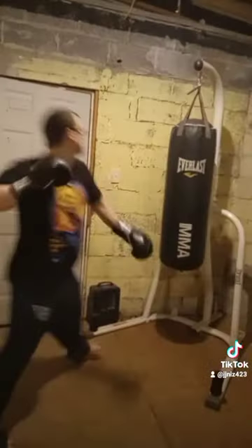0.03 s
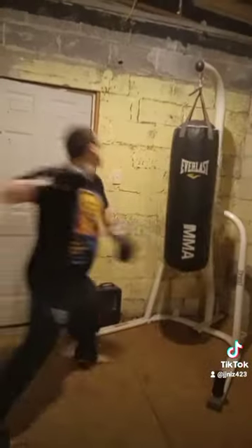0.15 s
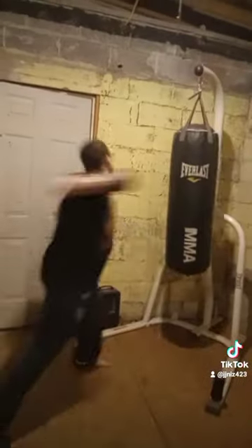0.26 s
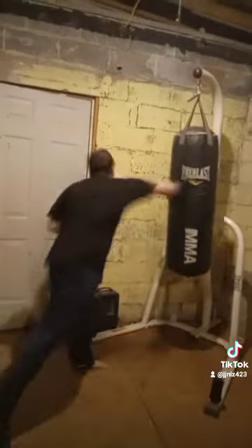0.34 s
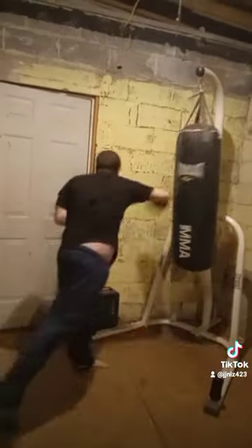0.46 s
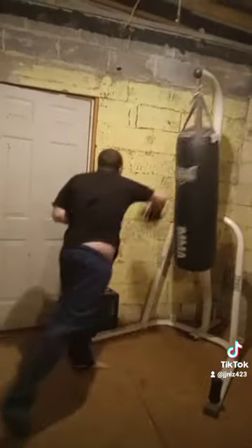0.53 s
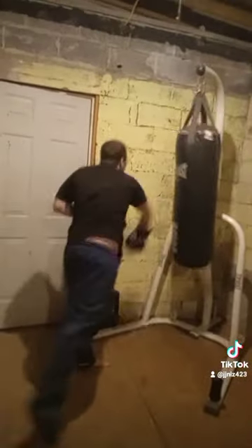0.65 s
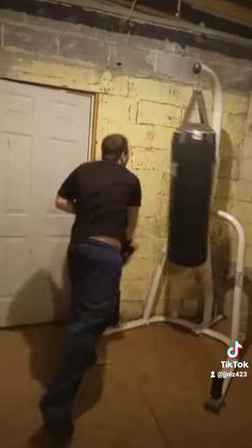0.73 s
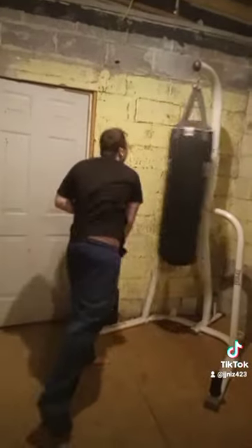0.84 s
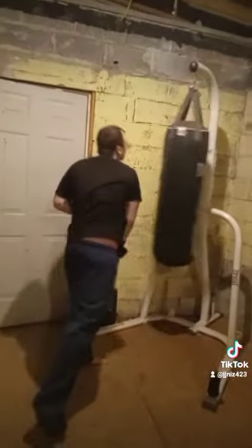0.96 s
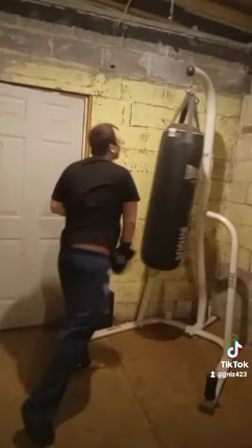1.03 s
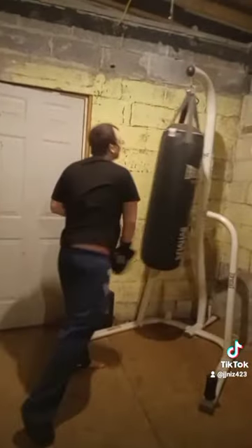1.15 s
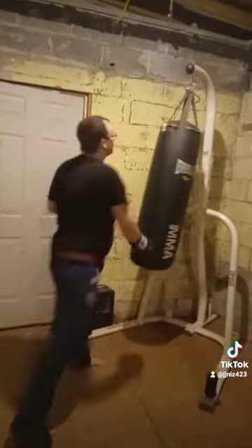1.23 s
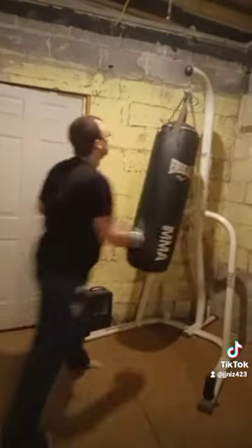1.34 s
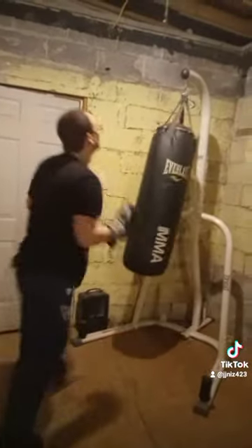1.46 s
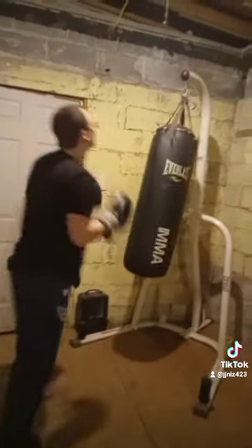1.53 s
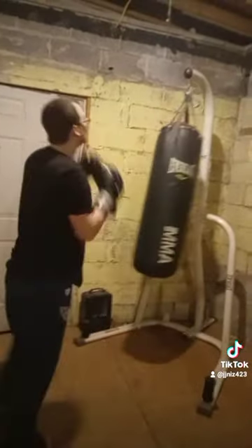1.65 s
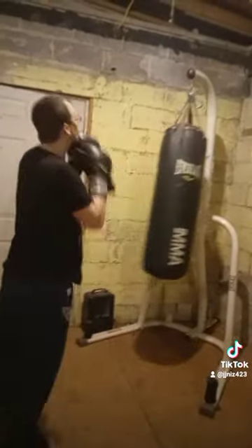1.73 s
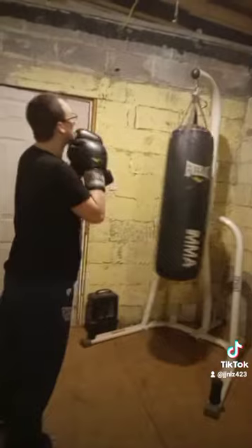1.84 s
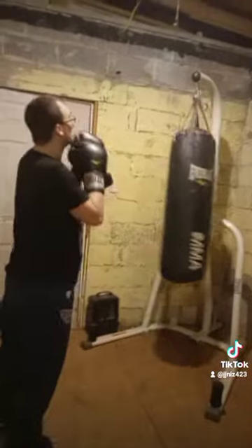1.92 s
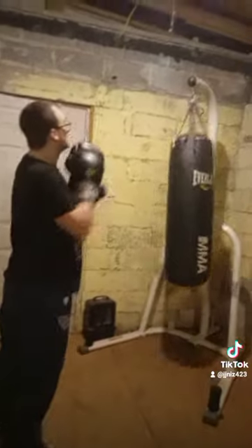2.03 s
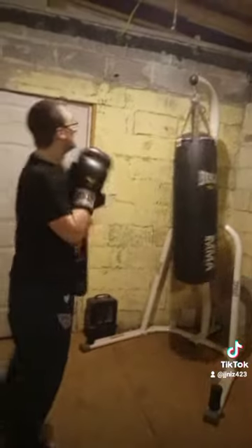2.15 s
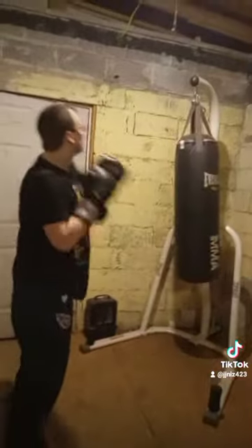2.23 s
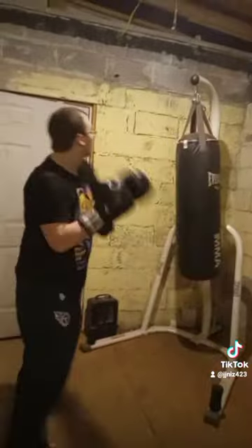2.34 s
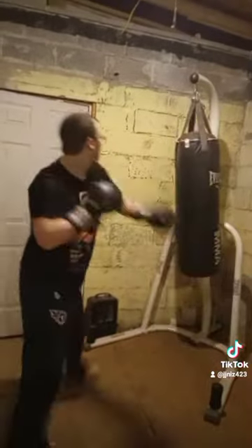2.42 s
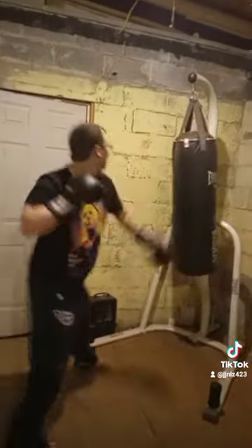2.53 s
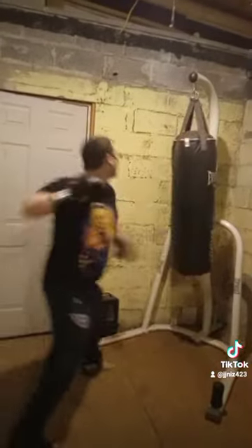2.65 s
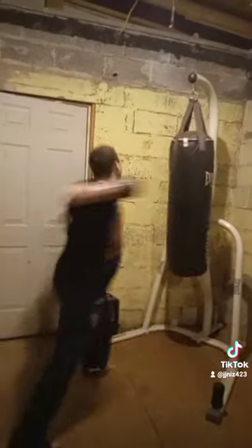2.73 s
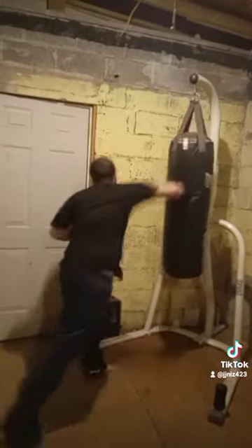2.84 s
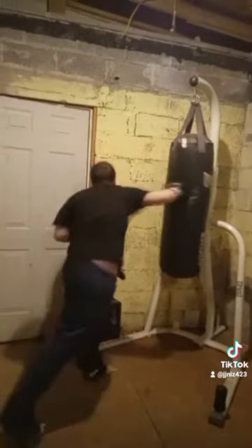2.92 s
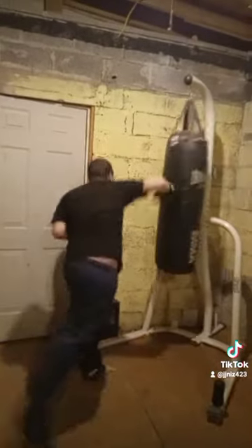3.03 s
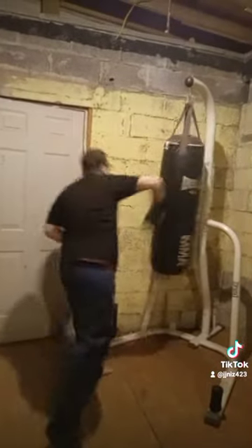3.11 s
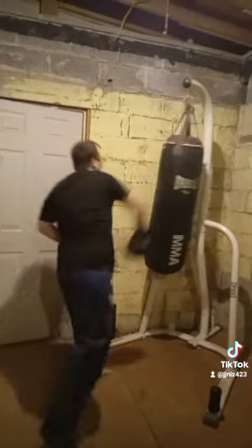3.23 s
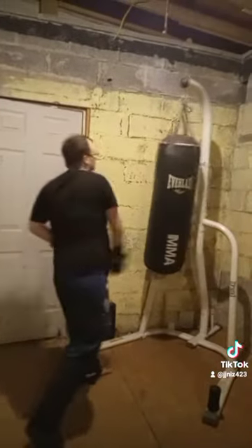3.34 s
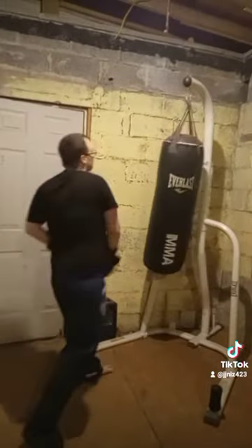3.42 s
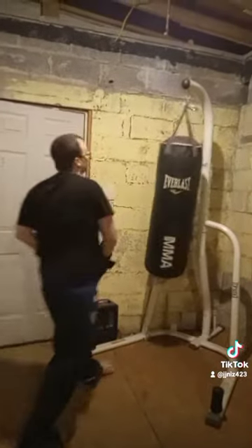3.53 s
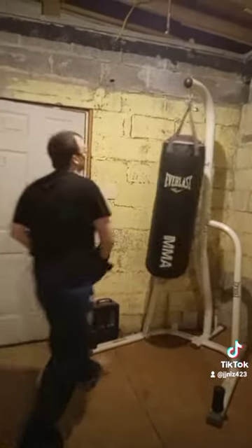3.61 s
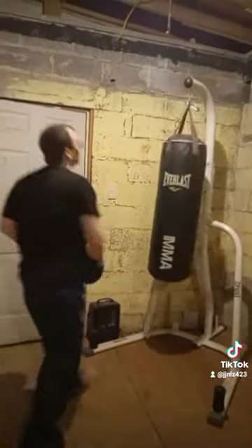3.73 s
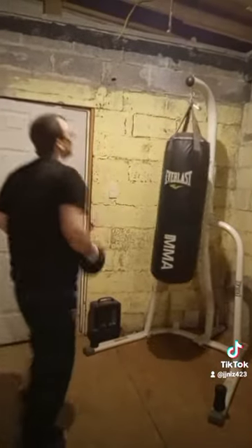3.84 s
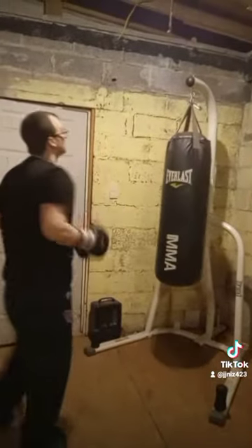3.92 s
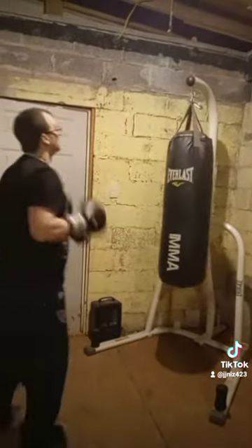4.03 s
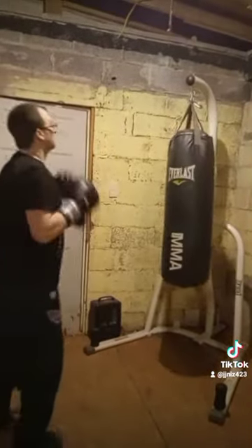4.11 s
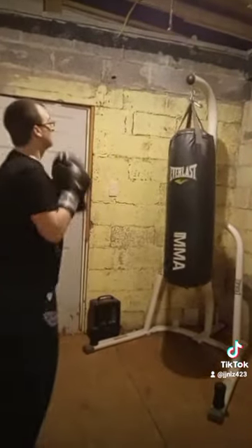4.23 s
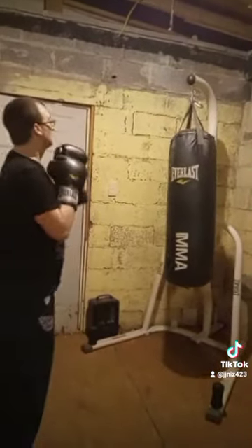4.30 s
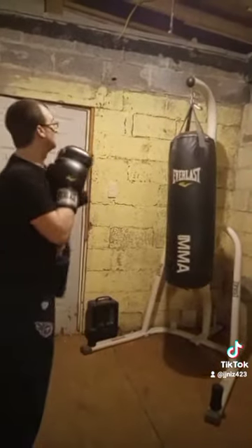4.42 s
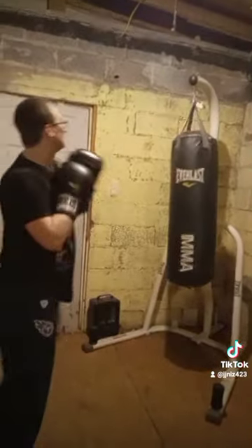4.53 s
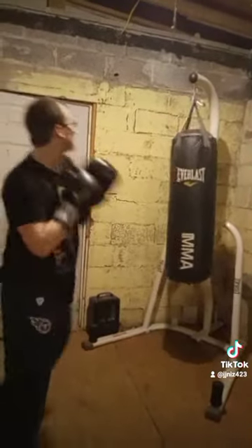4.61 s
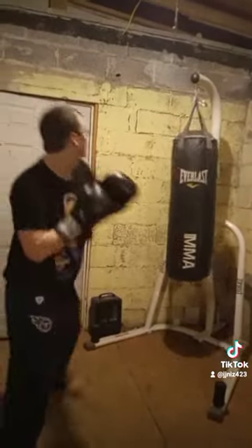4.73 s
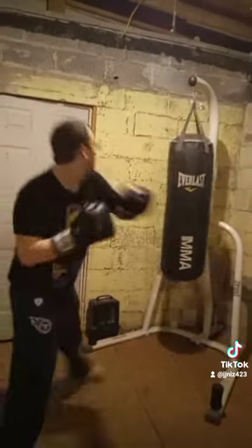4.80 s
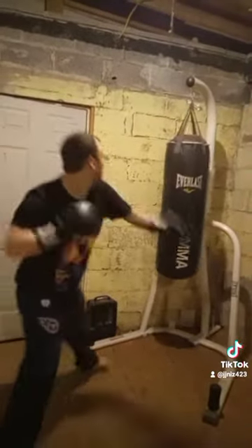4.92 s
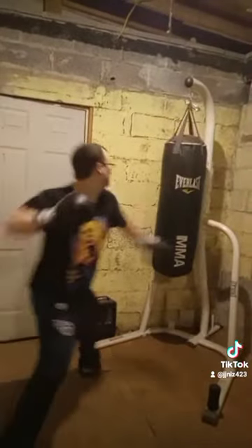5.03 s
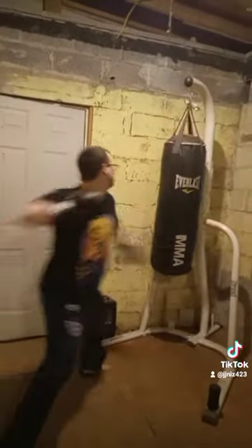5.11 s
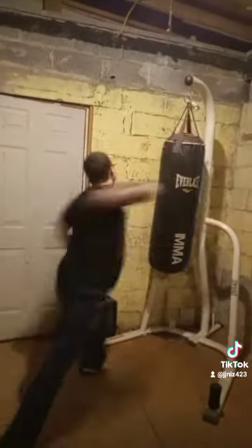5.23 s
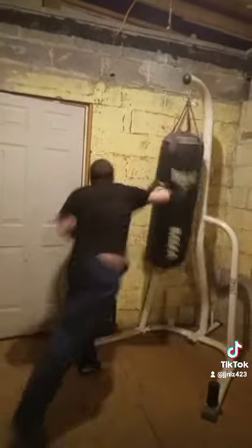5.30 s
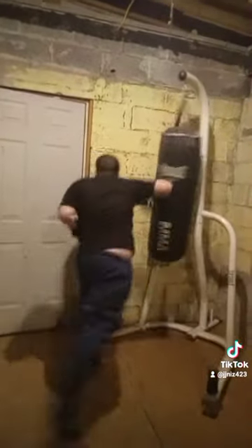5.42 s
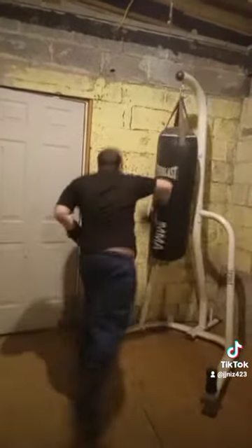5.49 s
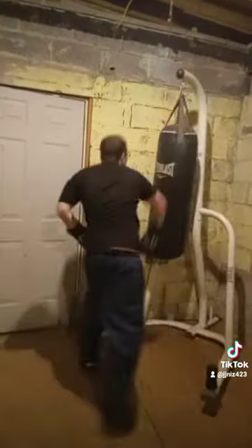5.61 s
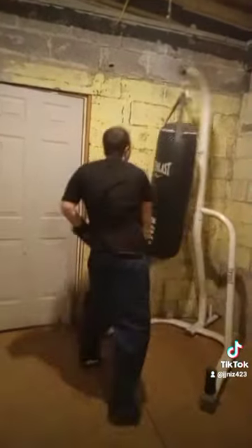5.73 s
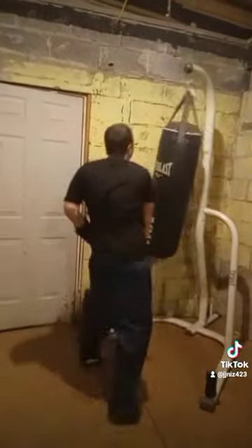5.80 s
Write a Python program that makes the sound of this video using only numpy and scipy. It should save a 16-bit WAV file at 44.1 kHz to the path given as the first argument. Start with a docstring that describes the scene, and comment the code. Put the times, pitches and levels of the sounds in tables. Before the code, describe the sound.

A small, hard basement with faint steady room hiss. Soft footfalls and small metal ticks at 0.1-0.2 s lead to the first and strongest punch at 0.35 s: a sharp leather smack, low thump and bright steel crash. The stand clanks, booms on the floor and rattles until about 1.1 s, with ringing tube tones and a thin creak near 1 s. A brief rapid hook chatter comes around 1.6 s, then near quiet with faint ticks. Weight shifts at 2.6-2.8 s precede the second punch at 2.8 s; clanks and rattling trail to 3.6 s, with lesser knocks and steps to 4.25 s. After a lull, steps near 5 s bring the third punch at 5.25 s, less of a slap but loudly clanking, with squeaks and a heavy landing with a metallic knock at 5.77 s, ending abruptly. Close, left-heavy stereo, peaks flattened.

```python
"""Three gloved punches land on a heavy bag that hangs from a tubular steel stand in a basement.
Clicks and shaped noise make the blows; sprays of contacts through steel modes make the clanks and rattle.
Sagging low tones and pushes into floor modes are feet and stand landing; ticks, creaks and tube hum join in.
Two microphone ports hear it, the left mostly louder and later; a look-ahead limiter flattens the loud part."""
import sys
import numpy as np
from scipy import signal
from scipy.fft import rfft, irfft
from scipy.io import wavfile
from scipy.ndimage import uniform_filter1d, minimum_filter1d

SR = 44100
rng = np.random.default_rng(int(sys.argv[2]) if len(sys.argv) > 2 else 0)


def wav_record(signal):
    """Record a signal, one row per channel, as 16-bit PCM in the file named by sys.argv[1]."""
    frames = np.transpose(np.atleast_2d(signal))
    bounded = np.clip(frames, -1, 1)
    # unit amplitude maps onto the largest positive 16-bit level
    quanta = np.round(bounded * 32767).astype(np.int16)
    wavfile.write(sys.argv[1], SR, quanta)


def magnitude_from_level(level_db):
    """Linear magnitude for a level in decibels (20 dB per decade)."""
    exponent = np.asarray(level_db, float) / 20
    return 10 ** exponent


N = 258330   # samples
ALIKE_BELOW_HZ = 330   # both ports share the sound below this

# glove on bag: start_s, level_db, shake_db, shake_hold_s, wind_up_s (before the blow)
PUNCHES = [(0.3432, 17.5, -17.5, .5, .5), (2.824, 11, -16.5, .55, 0.25), (5.2486, -0.5, -16.5, .33, 0.28)]
# modes of the steel parts: mode_hz, level_db, t60_s
STEEL = [(1213, 6, 0.07), (1617, 6, 0.09), (1790, 10, 0.1), (1940, 1.5, 0.076), (2050, 12, 0.057),
         (2250, 16, 0.033), (2427, 2.5, 0.033), (2596, -4.5, 0.064), (2797, -12, 0.082), (2890, -3.5, 0.17),
         (3300, 2.5, 0.035), (3504, -13.5, 0.033), (4214, -16.5, 0.16), (4440, 0.5, 0.096),
         (5640, -2.5, 0.04), (6080, 0.5, 0.05), (7780, 4, 0.033)]
# unpitched part of steel contacts: freq_hz, gain_db
CLATTER = [(410, -3.5), (700, -21.5), (898, 1.5), (984, -4), (1090, 4), (1870, 3), (2560, 5.5), (3160, 1),
           (4860, -6), (5840, -2), (7890, -13), (9990, -33.5), (13500, -56), (15000, -50), (16300, -44),
           (16800, -78)]
# soft heavy landings of a foot or a padded leg of the stand: start_s, level_db, t60_s, settled_pitch_hz
STEPS = [(0.121, -20.5, 0.6, 51.7), (0.215, -32, 0.33, 61.4), (1.126, -34.5, 0.25, 240.5),
         (1.259, -44, 0.16, 78), (2.681, -21, 0.5, 52.5), (2.715, -22, 0.19, 112), (2.759, -22, 0.14, 61),
         (3.083, -17, 0.17, 121), (3.908, -32, 0.29, 66.7), (4.247, -36, 0.13, 128), (5.005, -20, 0.2, 67),
         (5.097, -25.5, 0.2, 61.3), (5.715, -20, 0.17, 119), (5.768, -9, 0.17, 124.2)]


def rms_one(x):
    """Scale to rms 1."""
    return x / np.sqrt(np.mean(x ** 2) + 1e-20)


def cut(x, hz, kind, order=2):
    """Butterworth filter."""
    return signal.sosfilt(signal.butter(order, hz, kind, fs=SR, output="sos"), x)


def colour(x, points):
    """Causal minimum-phase filter through (Hz, dB) points, by folding the cepstrum."""
    hz, db = np.transpose(points)
    grid_hz = np.maximum(np.arange(2049) * SR / 4096, 1)
    cepstrum = irfft(np.log(magnitude_from_level(np.interp(np.log(grid_hz), np.log(hz), db))))
    cepstrum[1:2048] *= 2
    cepstrum[2049:] = 0
    impulse = irfft(np.exp(rfft(cepstrum)))
    return signal.fftconvolve(x, impulse)[:N]


def ring(x, modes):
    """Parallel two-pole modes; a unit click sets each ringing at its level."""
    out = 0
    for hz, db, t60_s in modes:
        r = magnitude_from_level(-60 / (t60_s * SR))
        w = 2 * np.pi * hz / SR
        out = out + signal.lfilter([0, magnitude_from_level(db) * np.sin(w)], [1, -2 * r * np.cos(w), r * r], x + 1e-18)
    return out


def bursts(starts_s, levels_db, t60s_s, rise_s):
    """Envelope: each event rises briefly and dies with its own decay."""
    out = np.zeros(N)
    for start_s, db, t60_s in zip(starts_s, levels_db, t60s_s):
        at = round(start_s * SR)
        t = np.arange(min(N - at, SR // 2)) / SR
        out[at:at + len(t)] += magnitude_from_level(db - 60 * t / max(t60_s, .01)) * (1 - np.exp(-t / rise_s))
    return out


def grains(per_s, spread_db):
    """Random contacts of uneven size and sign; rms 1."""
    sizes = magnitude_from_level(spread_db * np.minimum(rng.exponential(1, N), 3.5)) * rng.choice([-1, 1], N)
    return rms_one(sizes * (rng.random(N) < per_s / SR))


def unit(shape):
    """A filter scaled so that white noise of rms 1 leaves it with rms 1."""
    click = np.zeros(N)
    click[0] = 1
    scale = np.sqrt(np.sum(shape(click) ** 2))
    return lambda x: shape(x) / scale


def basement(x):
    """The bass reaches both ports alike; above it each gets direct sound and its own dense dying echoes."""
    t60_s = .13
    # the left port faces the stand, the right hears mostly echoes
    direct_db, echo_db = [[-7.5], [-14]], [[-2], [-.5]]
    t = np.arange(SR // 3) / SR
    tails = magnitude_from_level(-60 * t / t60_s) * (t > .002) * rng.standard_normal((2, len(t)))
    tails /= np.sqrt(np.sum(tails ** 2, axis=1, keepdims=True))
    bass = cut(x, ALIKE_BELOW_HZ, "low")
    echo_feed = cut(x, ALIKE_BELOW_HZ, "high")
    echoes = np.array([signal.fftconvolve(echo_feed, tail)[:N] for tail in tails])
    return bass + magnitude_from_level(direct_db) * (x - bass) + magnitude_from_level(echo_db) * echoes


def room_tone():
    """Steady coloured noise, shared by the ports in the bass and independent above."""
    # freq_hz, gain_db
    hush_points = [(18, -23), (30, 13), (109, -5.5), (657, -3), (811, -8.5), (1890, 5), (4500, -13.5),
                   (6020, -5.5), (8480, -16), (9680, -34.5), (13600, -34), (15200, -45), (16400, -27)]
    level_db = -55.5
    shared, left, right = rng.standard_normal((3, N))
    bass = cut(shared, ALIKE_BELOW_HZ, "low")
    hush = [colour(bass + cut(own, ALIKE_BELOW_HZ, "high"), hush_points) for own in (left, right)]
    return magnitude_from_level(level_db) * rms_one(np.array(hush))


def ground(x):
    """Modes of floor boards and room over a broad low thud."""
    # mode_hz, level_db, t60_s
    floor_modes = [(81.5, 2, 0.09), (139, 9, 0.13), (272, 0, 0.07), (408, -3, 0.05), (470, -8, 0.04)]
    return cut(x, [45, 700], "band") + magnitude_from_level(-54.5) * ring(x, floor_modes)


def steps():
    """Weight lands softly: a round low tone that sags in pitch as the floor settles."""
    rise_s, sag_s = 0.0082, 0.012
    starts_above = 0.49   # share of the settled pitch
    out, t = np.zeros(N + SR), np.arange(SR // 3) / SR
    for start_s, db, t60_s, hz in STEPS:
        cycles = hz * (t + starts_above * sag_s * (1 - np.exp(-t / sag_s)))
        envelope = magnitude_from_level(db - 60 * t / max(t60_s, .02)) * (1 - np.exp(-t / rise_s))
        at = round(start_s * SR)
        out[at:at + len(t)] += envelope * np.sin(2 * np.pi * cycles)
    return out[:N]


def thumps():
    """One push and a lumpy trail per landing excite the floor: a boom and the boards' higher knock."""
    # the stand's legs drop on the floor: start_s, boom_db, board_db, t60_s
    leg_drops = [(0.147, -21, -26, 0.09), (0.183, -24, -28, 0.33), (0.35, -21, -27, 0.35),
                 (0.508, -5, -13, 0.35), (0.648, -11, -18, 0.093), (0.721, -6, -16, 0.21),
                 (0.762, -19, -26, 0.17), (0.81, -15, -32, 0.22), (0.896, -21, -103, 0.67),
                 (2.824, -9.5, -57, 0.22), (3.021, -24, -15.5, 0.081), (3.084, -28, -17, 0.25),
                 (3.18, -17, -22.5, 0.059), (3.245, -13, -17, 0.37), (3.33, -16, -39, 0.05),
                 (3.396, -35, -57, 0.14), (3.529, -34, -27.5, 0.12), (5.252, -16, -24, 0.37),
                 (5.411, -18, -26, 0.29), (5.72, -29, -22.5, 0.19), (5.77, -28, -16.5, 0.34)]
    step_trails = [(s, db - 3, -120, t60_s) for s, db, t60_s, _ in STEPS]
    s, boom_db, board_db, t60_s = np.transpose(leg_drops + step_trails)
    boom = bursts(s, boom_db - 9.5, t60_s, rise_s=0.021) * grains(per_s=1400, spread_db=-5.0)
    board = bursts(s, board_db, t60_s, rise_s=0.001) * grains(per_s=750, spread_db=6.5)
    at = np.round((s + 0.002175) * SR).astype(int)
    boom[at] += magnitude_from_level(boom_db + 10.5)
    board[at] += magnitude_from_level(board_db + 21.5)
    boom = unit(lambda v: ground(cut(v, 190, "low")))(boom)
    return boom + unit(lambda v: ground(cut(v, [200, 800], "band")))(board)


def steel(x, pitched_db):
    """Contacts ring the steel modes over a broad clatter."""
    clatter = unit(lambda v: colour(v, CLATTER))(x)
    pitched = unit(lambda v: cut(ring(v, STEEL), 8300, "low", order=6))(x)
    return clatter + magnitude_from_level(pitched_db) * pitched


def shake_db(full_s, rise_db_s, fall_db_s, above_db, rest_db):
    """Level after each punch: climbs until full_s, falls once the punch's hold is over, down to rest."""
    s, _, punch_shake_db, hold_s, _ = np.transpose(PUNCHES)[:, :, None]
    since = np.arange(N) / SR - s
    climb = rise_db_s * np.maximum(full_s - since, 0)
    fall = fall_db_s * np.maximum(since - hold_s, 0)
    level = punch_shake_db + above_db - climb - fall
    return np.maximum(np.where(since > 0, level, -120).max(axis=0), rest_db)


def shaking():
    """Loose parts rattle and legs rumble between the knocks; joints stir as the floor gives in the wind-up."""
    # each: full_s, rise_db_s, fall_db_s, above_db (over the punch's shake), rest_db
    rattle_shape = (0.62, 278, 78, -1, -62)
    jingle_shape = (-1, 303, 216, -23.5, -62.5)   # thin treble of the rattle
    rumble_shape = (1.37, 10.5, 87.5, 0, -61.5)
    wind_up_rise_s, wind_up_rattle_db, wind_up_jingle_db = 0.12, -46, -42.5
    jingle_above_hz = 6000
    t = np.arange(N) / SR
    stir = sum(np.clip((t - s + wind_up_s) / wind_up_rise_s, 0, 1) * (t < s) for s, *_, wind_up_s in PUNCHES)
    # loose parts come in clumps
    lumps_db = 5. * rms_one(cut(rng.standard_normal(N), 40, "low"))
    contacts = rms_one(grains(per_s=980, spread_db=3.0) * magnitude_from_level(lumps_db))
    rattle_gain = magnitude_from_level(shake_db(*rattle_shape)) + magnitude_from_level(wind_up_rattle_db) * stir
    jingle_gain = magnitude_from_level(shake_db(*jingle_shape)) + magnitude_from_level(wind_up_jingle_db) * stir
    rattle = rattle_gain * cut(contacts, jingle_above_hz, "low", order=4)
    jingle = jingle_gain * cut(contacts, jingle_above_hz, "high", order=4)
    rumble = magnitude_from_level(shake_db(*rumble_shape)) * cut(grains(per_s=440, spread_db=6.0), 530, "low")
    return steel(rattle + jingle, pitched_db=-7.) + unit(ground)(rumble)


def creaks():
    """Metal rubs on metal: a gliding tone whose strength stutters as the joint sticks and slips."""
    # start_s, length_s, from_hz, to_hz, level_db
    rubs = [(.97, 0.16, 1815, 1800, -41), (1.616, 0.051, 3900, 4070, -37), (2.193, 0.092, 2080, 1990, -53),
            (2.457, .07, 1700, 1770, -57), (2.646, 0.055, 6000, 6000, -59),
            (5.598, 0.115, 1700, 1830, -35.5), (5.626, 0.084, 3220, 3340, -40.5),
            (5.708, 0.049, 2000, 1950, -34), (5.778, 0.024, 2250, 2010, -19)]
    rough_hz = 45
    out = np.zeros(N)
    stutter = 1 + .7 * rms_one(cut(rng.standard_normal(N), rough_hz, "low"))
    for start_s, length_s, from_hz, to_hz, db in rubs:
        at = round(start_s * SR)
        along = np.linspace(0, 1, round(length_s * SR))
        phase = 2 * np.pi * np.cumsum(from_hz + (to_hz - from_hz) * along) / SR
        out[at:at + len(along)] += magnitude_from_level(db) * np.sqrt(np.sin(np.pi * along)) * np.sin(phase)
    return out * stutter


def ticks():
    """Dry ticks of a link snapping over: each is a very short decaying sine."""
    # start_s, level_db, pitch_hz
    snaps = [(0.151, -28, 1810), (0.1808, -22.5, 2360), (2.19, -49, 2350), (2.405, -43.5, 3770),
             (2.5925, -38, 2600), (3.391, -17.5, 4300), (4.898, -40, 3020), (5.001, -33, 2300),
             (5.31, -25.5, 4700)]
    t60_s = .012
    out = np.zeros(N)
    t = np.arange(SR // 50) / SR
    for start_s, db, hz in snaps:
        at = round(start_s * SR)
        out[at:at + len(t)] += magnitude_from_level(db - 60 * t / t60_s) * np.sin(2 * np.pi * hz * t)
    return cut(out, 8500, "low", order=4)


def tube():
    """Single blows ring the long tube modes; the right port, facing the upright, is fed more of them."""
    # mode_hz, t60_s
    tube_modes = [(968, 0.47), (1008, 0.35), (1805, 0.54), (2896, 0.33), (5995, 0.12)]
    # blows: start_s, then level_db into each tube mode
    hum_blows = [(0.433, -29, -28, -46, -38, -44), (0.72, -28, -23, -47, -50, -44),
                 (.904, -68, -55, -34, -33, -25), (.983, -53, -57, -28.5, -34.5, -27),
                 (1.05, -67, -67, -32.5, -33, -33), (1.12, -66, -64, -32, -61, -61),
                 (2.632, -55, -63, -36.5, -46, -57), (2.902, -26, -25, -36, -35, -43),
                 (2.935, -25, -25, -50, -50, -50), (2.985, -28, -26, -50, -50, -50),
                 (3.09, -39, -27, -46, -40, -43), (3.39, -55, -55, -33, -39, -34),
                 (3.798, -47, -60, -31, -30.5, -36.5), (3.89, -77, -63, -52, -32.5, -44),
                 (5.311, -23, -23, -32, -48, -32), (5.39, -23.5, -50, -44, -49, -36),
                 (5.455, -31, -46, -48, -38.5, -45), (5.502, -22, -32, -44, -35, -33),
                 (5.575, -25, -45, -42, -52, -56), (5.665, -32, -46, -49, -53, -58),
                 (5.771, -36, -30, -60, -33, -39)]
    s, *levels_db = np.transpose(hum_blows)
    out = 0
    for (hz, t60_s), db in zip(tube_modes, levels_db):
        blows = np.zeros(N)
        blows[np.round(s * SR).astype(int)] = magnitude_from_level(db)
        out = out + ring(blows, [(hz, 0, t60_s)])
    # loose joints damp the tubes unevenly, so the ring flutters
    flutter_db = 4. * np.minimum(rms_one(cut(rng.standard_normal(N), 45, "low")), .8)
    out = cut(out, 8000, "low") * magnitude_from_level(flutter_db)
    return (out + magnitude_from_level(-4) * basement(out)) * magnitude_from_level([[0], [3.]])


def chatter():
    """The hook chatters once as the bag swings back: evenly spaced knock rows that swell, fade and sink."""
    # start_s, spacing_s, peak_s
    timing = (1.5913, .0187, 1.65)
    count, peak_db, swell_db_s, fade_db_s = 6, -20, 262, 362
    jingle_above_db, dulls_db_s = 4.5, 164
    start_hz, sinks_hz_s, t60_s = 3330, 19000, 0.041   # the struck pitch sinks as the hook seats
    start_s, spacing_s, peak_s = timing
    rows = []
    for since in spacing_s * np.arange(count):
        s = start_s + since
        clank_db = peak_db - swell_db_s * max(peak_s - s, 0) - fade_db_s * max(s - peak_s, 0)
        jingle_db = clank_db + jingle_above_db - dulls_db_s * since
        rows.append((s, clank_db, jingle_db, start_hz - sinks_hz_s * since, t60_s))
    return rows


def knocks():
    """Sprays of contacts ring the steel modes, favouring those near the struck pitch; three joints take turns."""
    # steel joints and hook: start_s, clank_db, jingle_db, pitch_hz, t60_s
    joint_knocks = [(0.148, -28, -55, 940, 0.025), (0.179, -23.5, -34, 1720, 0.029),
                    (0.3583, -11.5, -1, 1820, 0.18), (0.426, -19.5, -15, 2070, 1),
                    (0.5053, -14.5, -8.5, 2030, 0.079), (0.594, -22, -24, 1290, 0.56),
                    (0.6494, -24.5, -14, 2220, 0.91), (0.722, -24.5, -22, 1690, 0.39),
                    (0.8096, -18, -28, 2700, 0.37), (0.902, -37, -10.5, 3070, 0.29),
                    (0.9804, -32.5, -17, 1840, 0.28), (1.05, -23.5, -6.5, 2680, 0.058),
                    (1.0974, -21.5, -22, 2390, 0.094), (1.29, -37.5, -35, 1907, 0.15),
                    (1.43, -47.5, -50.5, 4390, 0.4), (1.4656, -30, -38.5, 1900, 0.19),
                    (1.9225, -48.5, -52, 1820, 0.31), (2.188, -37, -66, 1990, 0.034),
                    (2.4957, -47.5, -53, 1680, 0.45), (2.594, -46, -61, 2300, 0.096),
                    (2.632, -37, -37, 2120, 0.55), (2.7263, -32.5, -32, 3600, 0.37),
                    (2.7694, -25, -22.5, 3300, 0.039), (2.8574, -18.5, -15, 1800, 0.47),
                    (2.899, -9.5, -2, 2340, 0.033), (2.945, -24.5, -19.5, 2060, 1),
                    (3.0164, -20, -16.5, 2470, 0.48), (3.084, -15.5, -10, 2310, 0.091),
                    (3.128, -27, -24.5, 1780, 0.64), (3.1774, -30, -17, 1850, 0.63),
                    (3.2444, -26, -13, 1850, 0.42), (3.29, -23, -16.5, 2764, 0.14),
                    (3.3293, -13.5, -37, 1984, 0.039), (3.3867, -55, -9, 2680, 0.39),
                    (3.4745, -37, -11.5, 2650, 0.2), (3.5803, -33, -32.5, 2050, 0.29),
                    (3.793, -23.5, -23, 3000, 0.47), (3.887, -25, -32, 3000, 0.083),
                    (3.904, -24, -28, 2950, 0.033), (3.9953, -27.5, -37, 2190, 0.15),
                    (4.2158, -29.5, -34.5, 2280, 0.042), (4.234, -37, -49, 1810, 0.15),
                    (4.9, -65, -34.5, 2840, 0.43), (4.9347, -45.5, -33.5, 2570, 0.18),
                    (5.0006, -34.5, -38, 1910, 0.11), (5.1322, -37, -51, 1960, 0.044),
                    (5.19, -53, -23.5, 2350, 0.074), (5.2054, -19, -30, 1780, 0.029),
                    (5.266, -22.5, -16, 1760, 0.7), (5.308, -8, 0, 2240, 0.044),
                    (5.342, -22.5, -17, 2240, 0.58), (5.3867, -24.5, -22, 1940, 0.4),
                    (5.42, -20, -15.5, 2250, 0.081), (5.455, -22.5, -22.5, 1870, 0.7),
                    (5.502, -26, -10, 2490, 0.16), (5.572, -20.5, -45, 2350, 0.11),
                    (5.5972, -23.5, -57, 1900, 0.19), (5.69, -32, -26.5, 3150, 0.37),
                    (5.762, -15, -3.5, 2070, 0.059), (5.769, -14, -6, 2130, 0.027),
                    (5.7856, -22, -18, 1930, 0.61)]
    rise_s, start_t60_s = 0.0035, 0.025
    first_touch_db = 15   # the opening contact above the rms of the spray
    detune_share = .03   # loose parts sit anew at each knock, so their modes shift
    thins_below = 0.46   # a knock's clatter holds little below this share of its pitch
    out, spray, t = np.zeros((3, N)), np.zeros((3, N)), np.arange(SR // 5) / SR
    hz, mode_db, mode_t60_s = np.transpose(STEEL)[:, :, None]
    dying = magnitude_from_level(mode_db - 60 * t / mode_t60_s)
    rows = joint_knocks + chatter()
    contacts = grains(per_s=1500, spread_db=4.5)
    contacts[np.round((np.array(rows)[:, 0] + rise_s) * SR).astype(int)] = magnitude_from_level(first_touch_db)
    low, high = cut(contacts, 3510, "low", order=4), cut(contacts, 4410, "high", order=4)
    luck = rng.standard_normal((len(rows), 2, len(STEEL)))
    for k, (start_s, clank_db, jingle_db, pitch_hz, t60_s) in enumerate(rows):
        chance, detune = luck[k]
        joint = k % 3
        at = round(start_s * SR)
        n = min(len(t), N - at)
        # the trail plus a hard start
        fall = magnitude_from_level(-60 * t[:n] / max(t60_s, .02)) + 2.22 * magnitude_from_level(-60 * t[:n] / start_t60_s)
        shape = fall * (1 - np.exp(-t[:n] / rise_s))
        hit = shape * (magnitude_from_level(clank_db) * low[at:at + n] + magnitude_from_level(jingle_db) * high[at:at + n])

        near_db = -np.minimum(20.0 * np.abs(np.log2(hz[:, 0] / pitch_hz)), 12.)
        modes = dying * np.sin(2 * np.pi * hz * (1 + detune_share * detune[:, None]) * t)
        body = magnitude_from_level(near_db + 6.5 * chance) @ modes
        rung = signal.fftconvolve(hit, body / np.sqrt(np.sum(body ** 2)))[:N - at]
        out[joint, at:at + len(rung)] += rung

        # the broad clatter leans towards the struck pitch too
        leaning = cut(hit, [pitch_hz / 1.25, pitch_hz * 1.25], "band")
        spray[joint, at:at + n] += cut(hit, thins_below * pitch_hz, "high") + magnitude_from_level(-2.0) * leaning
    clatter = unit(lambda v: colour(v, CLATTER))
    return magnitude_from_level(-4.5) * cut(out, 9430, "low", order=6) + [clatter(x) for x in spray]


def punches():
    """Glove on bag: a sharp click, a short leather slap of noise grains and the bag's low push."""
    # freq_hz, gain_db
    slap_points = [(35, -49), (60, 15), (1050, -4), (2960, -1), (3920, -9.5), (5700, -3.5), (7740, -7.5),
                   (11500, -38), (15300, -41), (16400, -37)]
    s, db, *_ = np.transpose(PUNCHES)
    click = np.zeros(N)
    click[np.round(s * SR).astype(int)] = -magnitude_from_level(db + 8.0)
    slap = bursts(s, db - 16., 0 * s + 0.07, rise_s=0.0003) * grains(per_s=2900, spread_db=6.0)
    push = signal.lfilter([1], [1, -.97], click)
    leather = unit(lambda v: colour(v, slap_points))(cut(click + slap, 200, "high"))
    return leather + magnitude_from_level(-47) * ring(push, [(330, 0., .03)])


def scene():
    """Each source has its own echoes in the room; the room tone is steady."""
    places = [punches(), *knocks(), thumps() + steps(), shaking()]
    near = ticks() + creaks()   # small sounds stand out of their echoes
    small = near + magnitude_from_level(-8.5) * basement(near)
    return sum(basement(x) for x in places) + small + tube() + room_tone()


def limiter(x, top_db, release_db_s, ahead_s):
    """Gain falls ahead of peaks above the top and recovers at a fixed rate in dB."""
    ahead, t = round(ahead_s * SR), np.arange(N) / SR
    over_db = np.maximum(20 * np.log10(np.abs(x).max(axis=0) + 1e-9) - top_db, 0)
    held_db = np.maximum.accumulate(over_db + release_db_s * t) - release_db_s * t
    early_db = -minimum_filter1d(-held_db, 2 * ahead + 1)
    return x * magnitude_from_level(-uniform_filter1d(early_db, ahead))


def top_cut(x):
    """Nothing passes above the cut-off."""
    return signal.sosfilt(signal.butter(12, 16960, fs=SR, output="sos"), x)


def record(dry):
    """The right port is shaded and hears first; the band is cut at both ends, then limited."""
    # left above right: freq_hz, difference_db
    port_points = [(60, 11.5), (110, 10.5), (200, 9.5), (380, 12), (700, 9.5), (1290, 13.5), (2380, 17.5),
                   (4400, 12.5), (8120, 10.5), (15000, -15)]
    left_lag = 35   # samples
    left = np.concatenate([np.zeros(left_lag), dry[0, :-left_lag]])
    right = colour(dry[1], [(hz, -db) for hz, db in port_points])
    ports = magnitude_from_level(4.5) * cut(np.array([left, right]), 73.0, "high", order=3)
    ports = signal.sosfilt(signal.cheby2(10, 50, 16900, fs=SR, output="sos"), ports)
    mix = limiter(ports, top_db=-.3, release_db_s=250, ahead_s=.012)
    return top_cut(mix)


dry = scene()
out = record(dry)
wav_record(out)
```